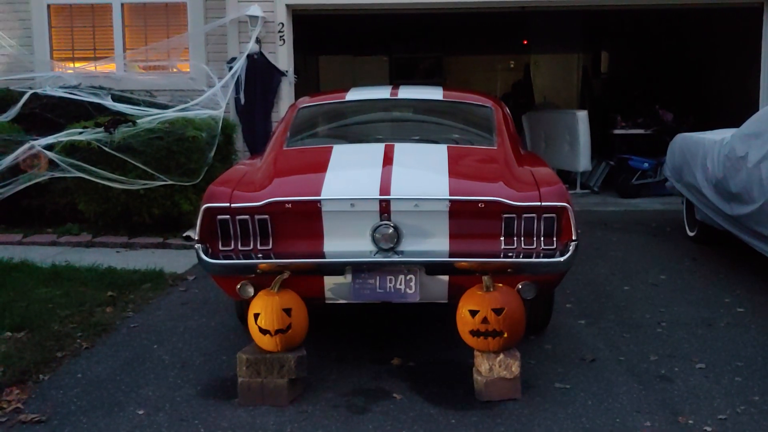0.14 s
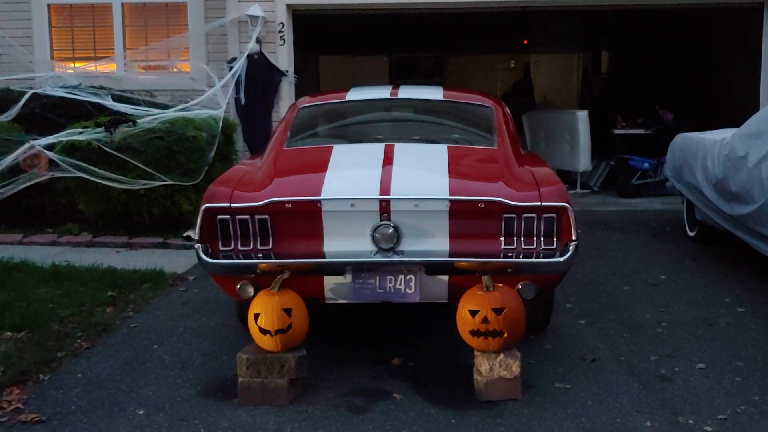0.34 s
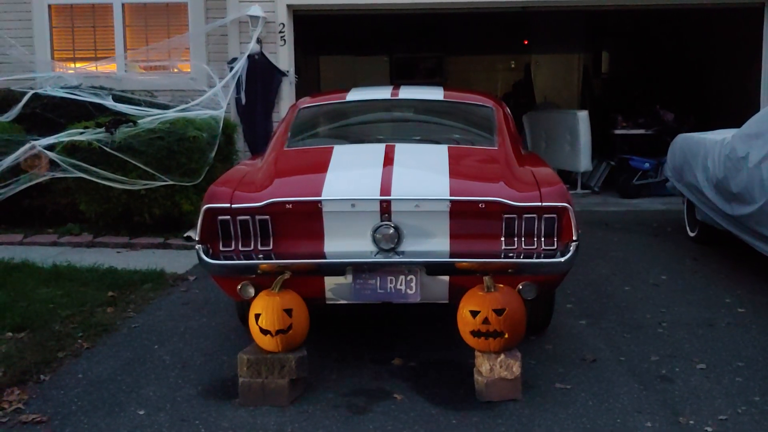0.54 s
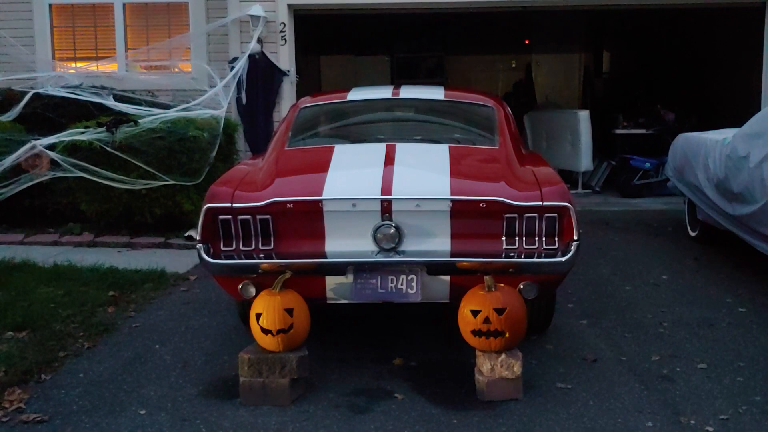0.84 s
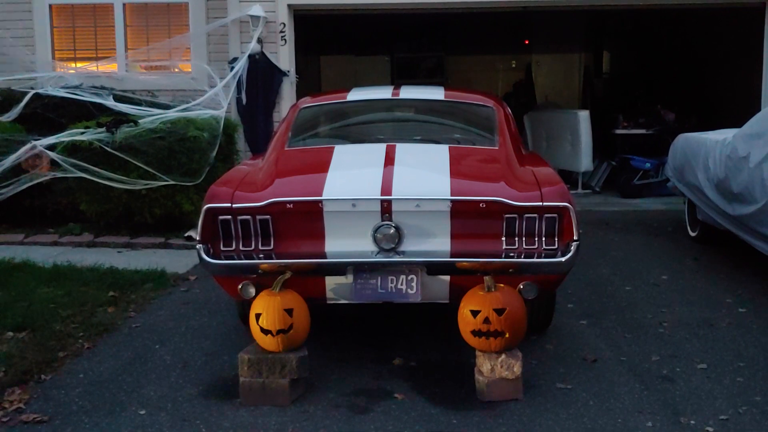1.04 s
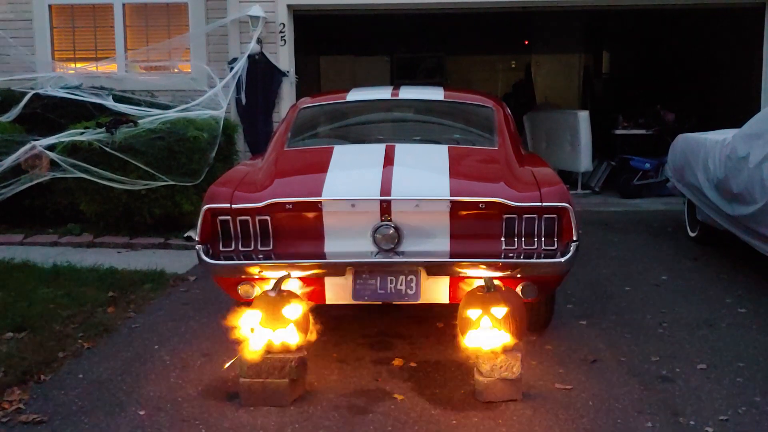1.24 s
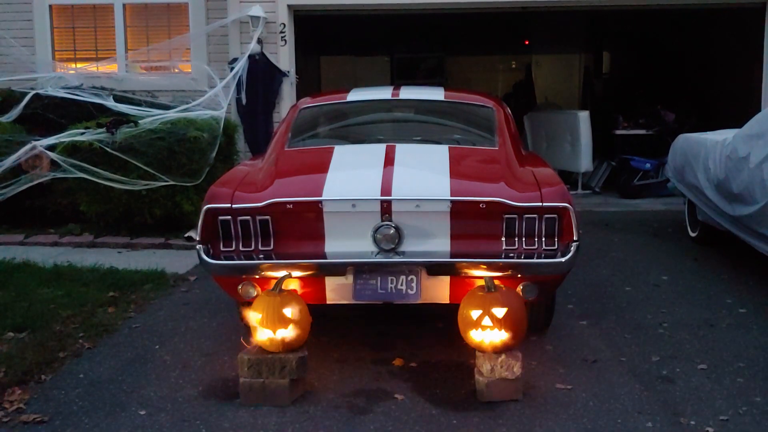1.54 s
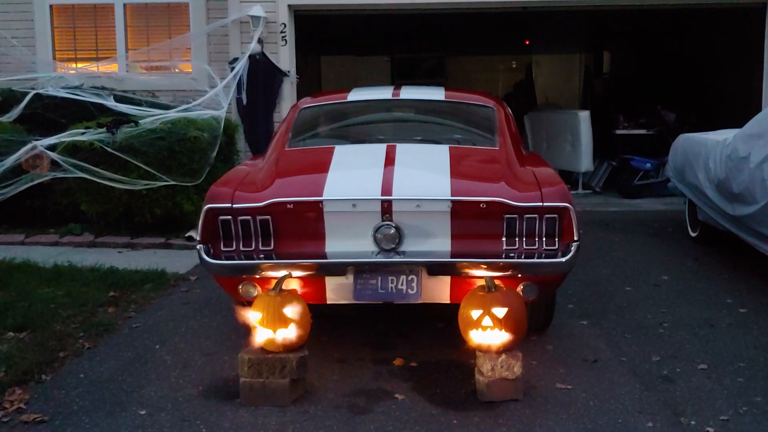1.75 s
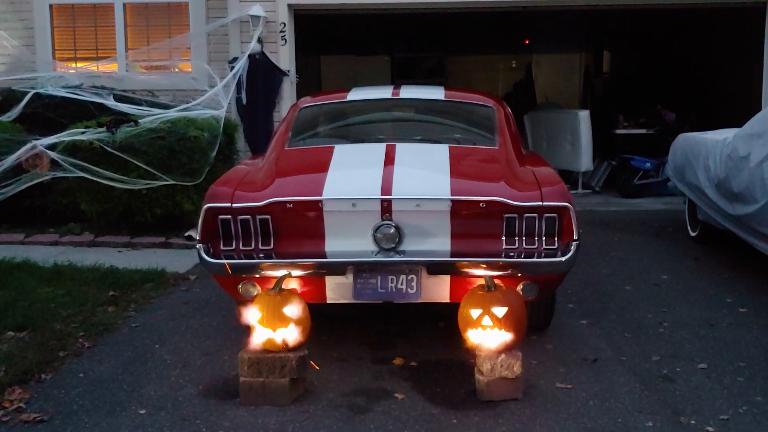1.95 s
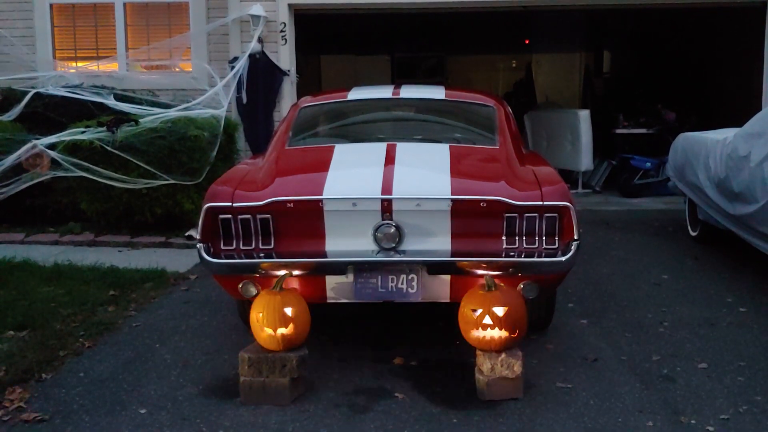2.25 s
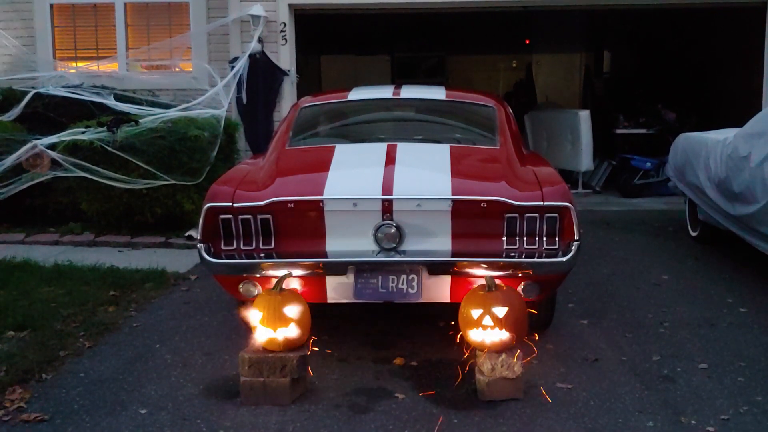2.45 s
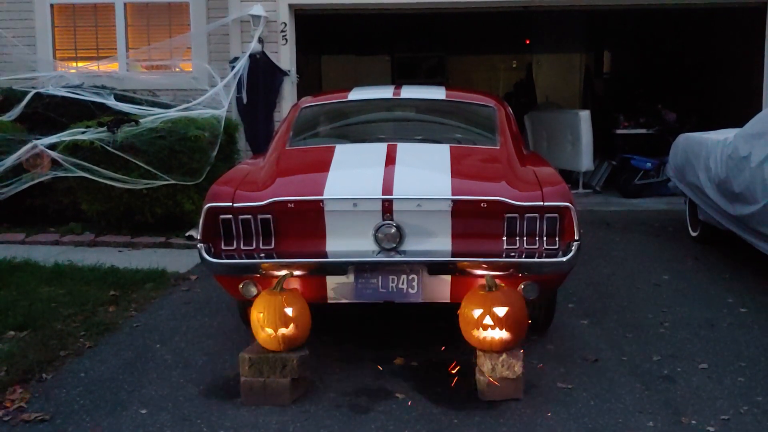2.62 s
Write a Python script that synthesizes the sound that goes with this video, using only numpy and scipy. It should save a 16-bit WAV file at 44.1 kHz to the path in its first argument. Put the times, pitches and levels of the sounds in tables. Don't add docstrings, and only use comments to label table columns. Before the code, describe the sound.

Throaty car exhaust blips twice, falls to a low rumble, with fire thumping, popping and backfiring

```python
import sys
import numpy as np
from scipy import signal
from scipy.fft import rfft, irfft
from scipy.io import wavfile
from scipy.ndimage import uniform_filter1d

SR = 44100
rng = np.random.default_rng(int(sys.argv[2]) if len(sys.argv) > 2 else 0)


def wav_out(sig):
    wavfile.write(sys.argv[1], SR, np.round(np.clip(np.atleast_2d(sig).T, -1, 1) * 32767).astype(np.int16))


def ratio(d):
    e = np.asarray(d, float) / 20
    return 10 ** e


N = 122598
T = np.arange(N) / SR

# time_s, cycle_rate_hz
ENGINE_SPEED = [(0, 35.73), (0.164, 41.22), (0.308, 39.25), (0.481, 43.67), (0.599, 42.44), (0.761, 38.01),
                (.87, 36.14), (1.047, 30.95), (1.192, 28.9), (1.302, 27.43)]
# start_s, end_s, pull_db, rasp_start_db, rasp_end_db
BLIPS = [
    (-.02, 0.167, -10.5, -30, -17.5),
    (0.328, 0.496, -14, -18.5, -19.5),
]
# start_s, end_s, ring_db, rasp_start_db, rasp_end_db
SURGES = [
    (0.18, 0.34, -13, -40, -41),
    (0.353, 0.505, -16.5, -39, -40),
    (0.541, 0.653, -8.5, -20.5, -24),
    (0.68, 0.753, -15.5, -39, -37),
    (0.749, 0.857, -11, -32, -42),
    (0.879, .97, -17.5, -46, -40),
    (0.99, 1.116, -17.5, -39, -43),
    (1.486, 1.61, -24, -45.5, -39),
    (1.632, 1.801, -20, -33.5, -35),
    (2.362, 2.553, -25.5, -30.5, -30.5),
]
# multiple, level_db
PULL_ORDERS = [(3, -21.5), (4, -6), (5, 0.5), (6, -16), (8, 0.5), (10, -23), (11, -5.5), (12, -21),
               (13, -18), (16, -32.5)]
CYLINDERS_DB = [5.5, 0.5, -8.5, -4.5, 1, -18, -2, -3]
# pitch_hz, width_hz, level_db
PIPE_MODES = [(123, 32, -4.5), (166, 24.7, 2), (257.3, 39, 1), (307.6, 17.5, -1.5), (416.3, 17.3, -2.5),
              (553, 17, -8.5), (692, 18.4, -11.5), (939, 25, -11.5), (1192, 27, -15.5)]
# pitch_hz, width_hz, level_db
MOUTH_MODES = [(717, 180, -4), (933, 197, 1), (1141, 92, 0), (1430, 590, -10.5), (1774, 320, -10.5)]
# time_s, roar_db, gas_flow_db
FLAME_FLOW = [(0, -28, -28.5), (0.129, -44, -25.5), (.27, -22.5, -32.5), (.43, -44, -23.5),
              (.68, -20.5, -29.5), (.76, -28.5, -29), (1.14, -25, -30.5), (1.209, -18, -35),
              (1.42, -22, -40), (1.75, -17.5, -38), (1.828, -21.5, -41.5), (2.151, -20.5, -42.5),
              (2.34, -22, -44.5), (2.38, -19.5, -38.5), (2.55, -21, -39), (2.63, -28.5, -46.5),
              (2.772, -25.5, -48), (2.78, -8, -44.5)]
# frequency_hz, density_db
ROAR_COLOUR = [(25, -4), (50, 1), (120, 7), (190, 6.5), (270, -0.5), (350, -41), (550, -13), (2500, -110)]
RUSH_COLOUR = [(200, -10.5), (400, 2.5), (650, -4), (1250, -6), (1600, -9), (2200, -8.5), (2800, -45),
               (5000, -100)]
HISS_COLOUR = [(2000, -3.5), (2800, -7), (4400, 1), (4900, -10), (6200, -8.5), (7100, -3), (7900, -16.5),
               (8700, -58)]
TOP_COLOUR = [(8400, -43.5), (9000, -6), (9800, -1.5), (10500, -5), (11900, 1.5), (12700, -15),
              (14500, -9.5), (15800, -33)]
# frequency_hz, likeness_0_to_1
EAR_LIKENESS = [(60, 0.95), (150, 1), (380, 1), (950, 0.89), (2380, 0.29), (5980, 0.059), (15000, 0.04)]
# start_s, end_s, pitch_hz, width_hz, level_db
WHISTLES = [(1.48, 1.57, 490, 18, -31.5), (1.45, 1.6, 1200, 79, -36.5), (1.68, 1.75, 1200, 36, -30.5),
            (1.92, 2.01, 1450, 44, -38), (1.5, 2.05, 515, 39, -32), (2.18, 2.574, 495, 25, -29),
            (1.25, 1.8, 2200, 54, -47.5), (2.02, 2.14, 1450, 56, -36), (1.75, 1.792, 488, 50, -24),
            (1.13, 1.184, 290, 21, -21), (0.026, 0.12, 730, 40, -25), (1.9, 2.0, 660, 72, -34),
            (.42, 0.485, 1020, 60, -23.5), (0.078, 0.18, 1160, 15, -24.5)]
# time_s, pitch_hz, level_db
HUMS = [
    [(0.197, 159.7, -12.5), (0.224, 153.2, -9.5), (0.36, 144, -17.5)],
    [(0.49, 172.7, -27.5), (0.544, 146, -9.5), (0.62, 126.6, -19)],
    [(.645, 57.2, -30), (.68, 54.5, -22), (.72, 55, -32)],
    [(.99, 248.3, -25), (1.05, 250, -15), (1.1, 233, -19.5)],
    [(.95, 166, -20.5), (1.16, 147.5, -11), (1.2, 142.3, -4), (1.27, 126.7, -13.5)],
    [(1.27, 124.6, -7), (1.35, 130.4, -17.5), (1.5, 144.4, -13.5)],
    [(1.73, 138.5, -22), (1.795, 135.9, -4), (1.83, 129.4, -17), (1.99, 115.6, -15.5)],
    [(2.382, 99.5, -8.5), (2.45, 122.1, -7), (2.536, 146.2, -5), (2.63, 149, -26.5)],
    [(2.66, 168, -40.5), (2.69, 159.7, -13), (2.78, 161.4, -19)],
]
# start_s, end_s, first_hz, last_hz, level_db
SONGS = [(0.208, 0.319, 434, 404, -22), (0.314, 0.385, 716, 716, -24.5), (0.528, 0.646, 429, 424, -18.5),
         (.55, 0.652, 548, 561, -22.5), (.58, 0.656, 700, 722, -24.5), (0.752, 0.868, 305.4, 295.4, -16.5),
         (.755, 0.858, 423.5, 409, -19), (0.781, 0.968, 560.8, 525, -26.5), (0.976, 1.116, 692, 680, -30.5),
         (0.992, 1.09, 414, 406, -25), (2.619, 2.78, 269.2, 290, -29.5)]
# start_s, peak_db
POPS = [(0.237, -21), (0.324, -5.5), (0.522, -27), (0.555, -9), (0.668, -11), (1.15, -9.5), (1.271, -9.5),
        (1.282, -0.5), (1.618, -0.5), (1.701, -2), (1.725, -2), (1.737, 1), (1.771, -7.5), (1.86, -9),
        (1.953, 0.5), (2.038, 0.5), (2.125, 1), (2.155, -2.5), (2.186, -1.5), (2.241, -6), (2.294, -6.5)]
# start_s, thump_db, spit_db, spit_length_s
CRACKS = [
    (2.3545, -12.5, -25, .004),
    (2.36, -27, -12.5, 0.0036),
    (2.363, -3, -17, .006),
    (2.373, -45, -20.5, 0.01),
    (2.381, -41, -19.5, 0.0035),
    (2.383, -8.5, -15.5, 0.0047),
    (2.401, -5, -21.5, 0.062),
    (2.7785, -17.5, -10, 0.0035),
]
# start_s, level_db
CRACKLES = [(1.359, -22), (1.682, -19.5), (1.764, -20.5), (1.78, -21.5), (1.907, -21.5), (1.948, -28),
            (2.094, -25.5), (2.154, -25.5), (2.294, -31.5), (2.311, -22), (2.344, -18.5)]
# start_s, level_db
BANGS = [
    (.327, -11.5),
    (.558, -12),
    (2.3555, -22.5),
    (2.3595, -11),
    (2.3632, -18),
    (2.368, -14),
    (2.382, -15),
    (2.403, -17),
]
# pitch_hz, width_hz, level_db
BANG_MODES = [(680, 95, -4), (986, 140, -6), (2000, 610, -14.5), (4060, 1600, -26)]
# frequency_hz, left_minus_right_db
PORT_LEAN = [(60, 0.5), (130, 2), (290, 1.0), (640, 2), (1410, -1.5), (3100, -3), (6820, -2.0),
             (15000, 7.5)]

IDLE_HZ, SETTLE_S = 22.35, 0.5
CYCLE_AT_S = 0.426
ORDER_WAVER_DB, FIRING_SCATTER_DB = 1.3, 0.5
PIPE_FLOOR_DB, RING_SPREAD_TURNS = -39, 0.37
RASP_NOISE = 0.5
RISE_S, FALL_S = 0.0062, 0.034
COAST_PULL_DB, COAST_RING_DB, COAST_RASP_DB, COAST_FADE_DB_PER_S = -26, -24, -38, 4
ROAR_DB, ROAR_LUMP_DB = 5.5, 1.2
RUSH_DB, RUSH_FOLLOW, RUSH_PATCH_DB, RUSH_FLICKER_DB = -27, 0.42, 2.5, -0.4
HISS_DB, TOP_DB, TOP_FOLLOW, TOP_LAG_S = 1, -57, 1.12, 0.14
HUM_EDGE_S, HUM_OVERTONE_DB, HUM_WAVER_DB = 0.0076, -18.5, 1.2
POP_HZ, POP_WIDTH_HZ, POP_DB = 131.7, 31.3, -2
PUFF_DB, PUFF_S = -24, 0.011
SPIT_HISS_DB, SPIT_TOP_DB, SPIT_PATCH_DB = -12, -40, 2.0
GLOW_S, GLOW_DB, GLOW_LENGTH_S = 2.362, -48.5, 0.18
YARD_T60_S, YARD_DB = 0.2, -7.5
MIC_LOW_HZ, LIMIT = 44.6, 0.99


def evened(x):
    return x / np.sqrt(np.mean(x ** 2) + 1e-20)


def read(points, hz):
    f, value = np.transpose(points)
    return np.interp(np.log(hz + 1), np.log(f + 1), value, left=value[0], right=value[-1])


def wander(rate_hz, count=1):
    f = np.geomspace(rate_hz / 8, rate_hz, 12)[:, None]
    t = T[::64]
    curves = []
    for _ in range(count):
        slow = np.sin(2 * np.pi * (f * t + rng.random(f.shape))).sum(0)
        curves.append(np.interp(T, t, evened(slow)))
    return np.array(curves)


def resonate(x, hz, width_hz):
    r = np.exp(-np.pi * width_hz / SR)
    feedback = [1, -2 * r * np.cos(2 * np.pi * hz / SR), r * r]
    return signal.lfilter([(1 - r * r) / 2, 0, -(1 - r * r) / 2], feedback, x)


def noise(colour, patch_db, flicker_db, size=512):
    frames, hz = 4 * N // size + 5, np.fft.rfftfreq(size, 1 / SR)
    a, b, c, d, patch = rng.standard_normal((frames, len(hz), 5)).T
    patch = uniform_filter1d(patch, size=6, axis=0)
    patch = evened(uniform_filter1d(patch, size=10, axis=1))
    flicker = evened(uniform_filter1d(rng.standard_normal(frames), size=3))
    same = np.clip(read(EAR_LIKENESS, hz), 0, 1)[:, None]
    left = a + 1j * b
    right = same * left + np.sqrt(1 - same ** 2) * (c + 1j * d)
    level_db = read(colour, hz)[:, None] + patch_db * patch + flicker_db * flicker
    spectrum = np.array([left, right]) * ratio(level_db)
    return evened(signal.istft(spectrum, nperseg=size, noverlap=3 * size // 4)[1][:, :N])


def spells(rows, coast_db):
    out = ratio(coast_db - COAST_FADE_DB_PER_S * T)
    for a, b, first_db, last_db in rows:
        edge = np.clip((T - a) / RISE_S, 0, 1) * np.exp(-np.maximum(T - b, 0) / FALL_S)
        out = np.maximum(out, edge * ratio(np.interp(T, [a, b], [first_db, last_db])))
    return out


def crankshaft():
    s, hz = np.transpose(ENGINE_SPEED)
    hz = np.interp(T, s, hz)
    settle = 1 - np.exp(-np.maximum(T - s[-1], 0) / SETTLE_S)
    hz = hz + (IDLE_HZ - hz) * settle
    turns = np.cumsum(hz) / SR
    return hz, turns + -np.interp(CYCLE_AT_S, T, turns) % 1


def loaded_orders(turns):
    pull = np.zeros(N)
    for (k, db), waver in zip(PULL_ORDERS, wander(12, count=len(PULL_ORDERS))):
        phase = 2 * np.pi * (round(k) * turns + rng.random())
        pull += ratio(db + ORDER_WAVER_DB * waver) * np.cos(phase)
    return evened(pull)


def pipe_ring(hz, turns):
    grid = np.arange(2000.)
    pipe = ratio(PIPE_FLOOR_DB) / (1 + (grid / 900) ** 2)
    for f, width, db in PIPE_MODES:
        pipe += ratio(db) / (1 + ((grid - f) / width) ** 4)
    ring = np.zeros(N)
    for k, waver in enumerate(wander(12, count=30), 3):
        phase = 2 * np.pi * (k * turns + RING_SPREAD_TURNS * rng.random())
        ring += np.interp(k * hz, grid, pipe) * ratio(ORDER_WAVER_DB * waver) * np.cos(phase)
    return evened(ring)


def mouth_rasp(turns):
    cylinders = len(CYLINDERS_DB)
    firing = np.floor(cylinders * turns).astype(int)
    scatter_db = FIRING_SCATTER_DB * rng.standard_normal(N // 50)[firing]
    size = ratio(np.take(CYLINDERS_DB, firing % cylinders) + scatter_db)
    kicks = size * (np.diff(firing, prepend=0) > 0)
    gush = size * np.exp(-3.0 * (cylinders * turns % 1)) * rng.standard_normal(N)
    drive = (1 - RASP_NOISE) * evened(kicks) + RASP_NOISE * evened(gush)
    rasp = np.zeros(N)
    for k, (f, width, db) in enumerate(MOUTH_MODES):
        rasp += (-1) ** k * ratio(db) * resonate(resonate(drive, f, width), f, 3 * width)
    return evened(rasp)


def engine():
    hz, turns = crankshaft()
    pull_gain = spells([(a, b, db, db) for a, b, db, *_ in BLIPS], COAST_PULL_DB)
    ring_gain = spells([(a, b, db, db) for a, b, db, *_ in SURGES], COAST_RING_DB)
    rasp_gain = spells([(a, b, c, d) for a, b, _, c, d in BLIPS + SURGES], COAST_RASP_DB)
    return pull_gain * loaded_orders(turns) + ring_gain * pipe_ring(hz, turns) + rasp_gain * mouth_rasp(turns)


def flame():
    s, roar_db, flow_db = np.transpose(FLAME_FLOW)
    flow_db = np.interp(T, s, flow_db)
    swing_db = flow_db - flow_db.mean()
    roar_db = np.interp(T, s, roar_db) + ROAR_DB + ROAR_LUMP_DB * wander(35)[0]
    roar = ratio(roar_db) * noise(ROAR_COLOUR, 2.06, 0, size=2048)
    rush = ratio(RUSH_DB + RUSH_FOLLOW * swing_db) * noise(RUSH_COLOUR, RUSH_PATCH_DB, RUSH_FLICKER_DB)
    hiss = ratio(flow_db + HISS_DB) * noise(HISS_COLOUR, 0.72, 0.43)
    late_db = np.interp(T - TOP_LAG_S, T, uniform_filter1d(swing_db, size=9000)) - 0.5
    top_db = TOP_DB + TOP_FOLLOW * np.maximum(swing_db, late_db)
    return roar + rush + hiss + ratio(top_db) * noise(TOP_COLOUR, 1.6, 0.57)


def whistles():
    air = rng.standard_normal(N)
    out = np.zeros(N)
    for (a, b, f, width, db), flutter in zip(WHISTLES, wander(25, count=len(WHISTLES))):
        tone = evened(resonate(resonate(air, f, 2 * width), f, width))
        out += spells([(a, b, db, db)], -81) * ratio(1.4 * flutter) * tone
    return out


def hollows():
    out, waver = np.zeros(N), wander(30)[0]
    for swell in HUMS:
        s, hz, db = np.transpose(swell)
        phase = 2 * np.pi * (np.cumsum(np.interp(T, s, hz) * (T > s[0])) / SR + 0.5)
        edge = np.clip(np.minimum(T - s[0], s[-1] - T) / HUM_EDGE_S, 0, 1)
        tone = np.sin(phase) + ratio(HUM_OVERTONE_DB) * np.sin(2 * phase)
        out += np.sqrt(2) * edge * ratio(np.interp(T, s, db) + HUM_WAVER_DB * waver) * tone
    return out


def songs():
    out = np.zeros(N)
    for a, b, first_hz, last_hz, db in SONGS:
        phase = 2 * np.pi * np.cumsum(np.interp(T, [a, b], [first_hz, last_hz])) / SR
        out += np.sqrt(2) * spells([(a, b, db, db)], -89) * np.sin(phase)
    return out


def pops():
    thump, puff, spit = np.zeros((3, N))
    # start_s, thump_db, puff_db, spit_db, length_s; -99 is silent
    rows = [(s, db + POP_DB, db + PUFF_DB, -99, PUFF_S) for s, db in POPS]
    rows += [(s, db, -99, spit_db, length) for s, db, spit_db, length in CRACKS]
    rows += [(s, -99, db, -99, PUFF_S) for s, db in CRACKLES]
    for (s, db, puff_db, spit_db, length), detune in zip(rows, rng.uniform(1.0, 1.12, len(rows))):
        u = np.maximum(T - s, 0)
        decay = np.minimum(u / 0.00085, 1) * np.exp(-np.pi * POP_WIDTH_HZ * u)
        thump -= ratio(db) * decay * np.sin(2 * np.pi * POP_HZ * detune * u)
        fade = (u > 0) * np.minimum(u / 0.0015, 1) * np.exp(-u / length)
        puff += ratio(puff_db) * fade
        spit += ratio(spit_db) * fade
    bright = ratio(SPIT_HISS_DB) * noise(HISS_COLOUR, SPIT_PATCH_DB, 1.3, size=256)
    bright += ratio(SPIT_TOP_DB) * noise(TOP_COLOUR, 2.8, 1.5, size=256)
    glow_gain = ratio(GLOW_DB) * (T > GLOW_S) * np.exp(-(T - GLOW_S) / GLOW_LENGTH_S)
    glow = glow_gain * noise(TOP_COLOUR, 1.7, 0.7)
    return thump + (puff + spit) * noise(RUSH_COLOUR, 0.42, 0.75, size=256) + spit * bright + glow


def bangs():
    s, db = np.transpose(BANGS)
    shocks = np.bincount((s * SR).astype(int), ratio(db), N)
    out = np.zeros(N)
    for f, width, mode_db in BANG_MODES:
        out += ratio(mode_db) * resonate(shocks, f, width) * SR / (2 * np.pi * width)
    return out


def yard(x):
    t = T[:SR // 3]
    taps = rng.choice([-1., 0, 1.], (2, len(t)), p=[.02, .96, .02])
    taps = taps * ratio(-60 * t / YARD_T60_S) * (t > .004)
    low_cut = signal.butter(2, 500, "high", fs=SR, output="sos")
    taps = signal.sosfilt(low_cut, taps / np.linalg.norm(taps[0]))
    return x + ratio(YARD_DB) * signal.fftconvolve(x[None], taps, axes=1)[:, :N]


def scene():
    muffle = signal.butter(4, 3000, fs=SR, output="sos")
    pipes = signal.sosfilt(muffle, engine() + whistles())
    return yard(pipes + songs() + bangs() + hollows()) + flame() + pops()


def top_cut(x):
    return signal.sosfilt(signal.butter(12, 15950, fs=SR, output="sos"), x)


def record(dry):
    lean_db = read(PORT_LEAN, np.fft.rfftfreq(N, 1 / SR)) / 2
    ports = irfft(rfft(dry) * ratio([lean_db, -lean_db]), N)
    ports = signal.sosfilt(signal.butter(2, MIC_LOW_HZ, "high", fs=SR, output="sos"), ports)
    limited = ports / (1 + (ports / LIMIT) ** 4) ** (1 / 4)
    return top_cut(limited)


dry = scene()
out = record(dry)
wav_out(out)
```